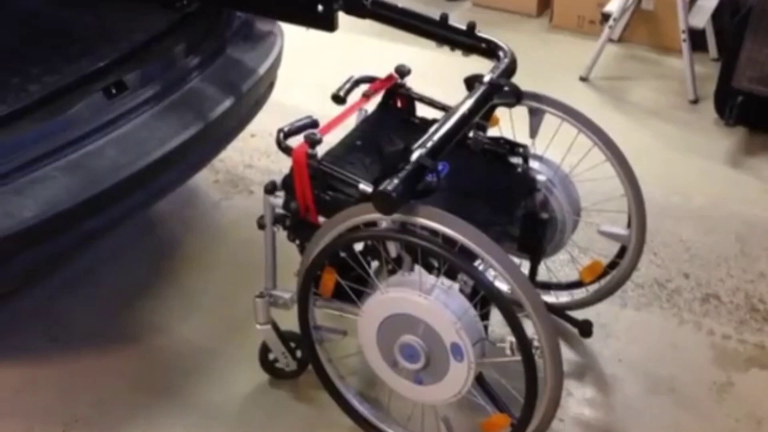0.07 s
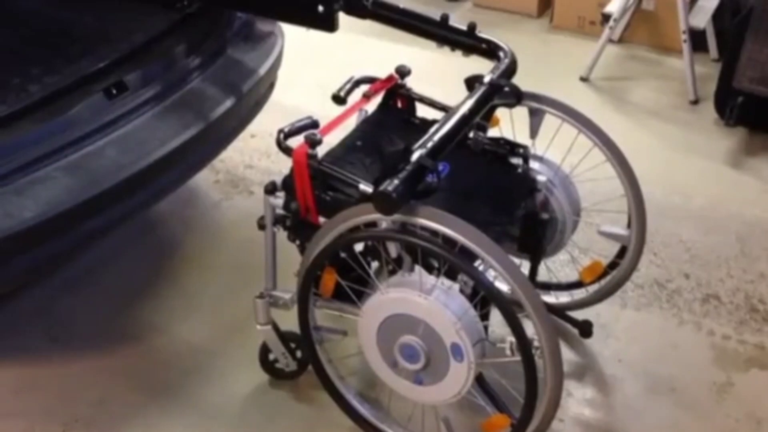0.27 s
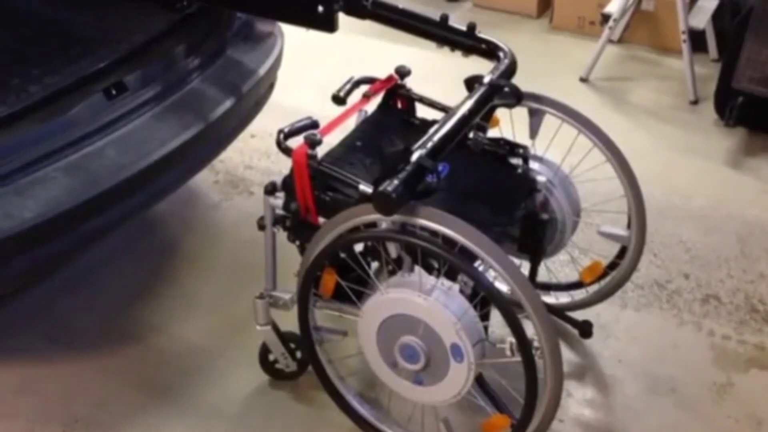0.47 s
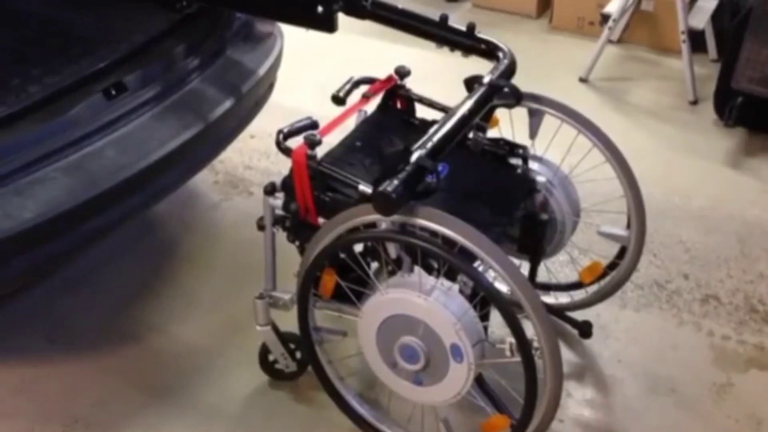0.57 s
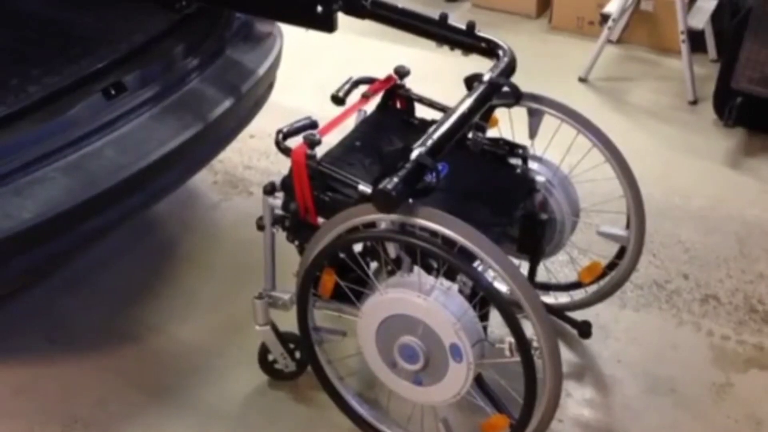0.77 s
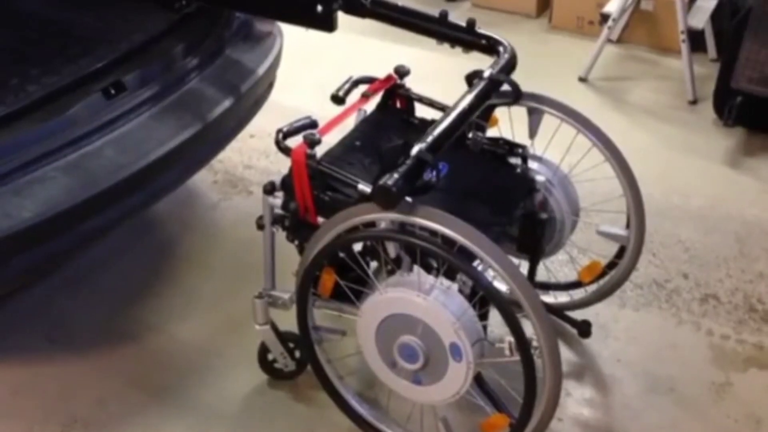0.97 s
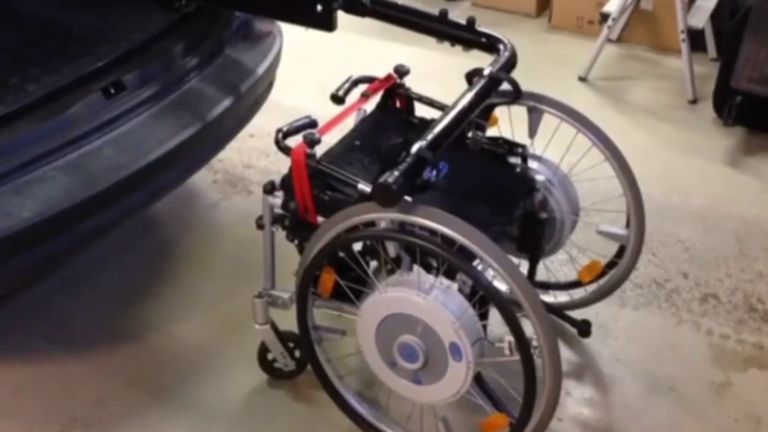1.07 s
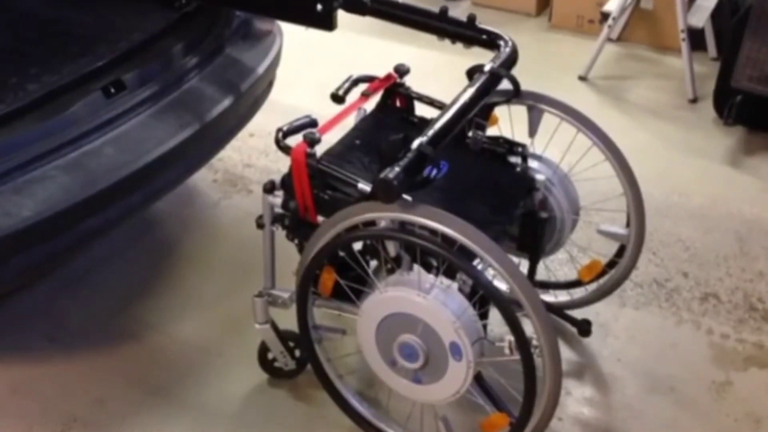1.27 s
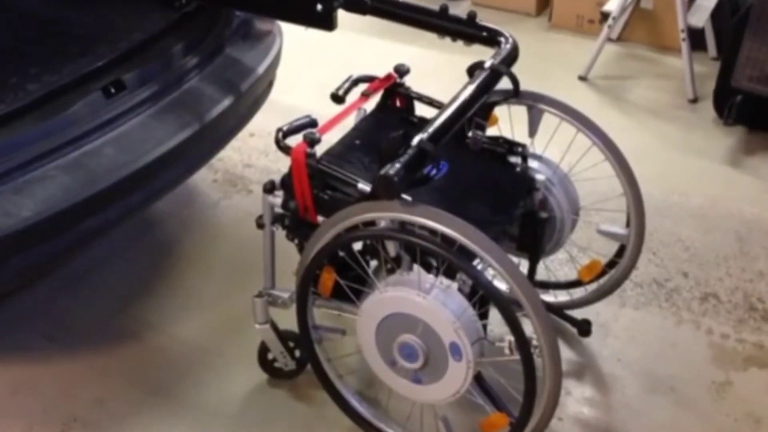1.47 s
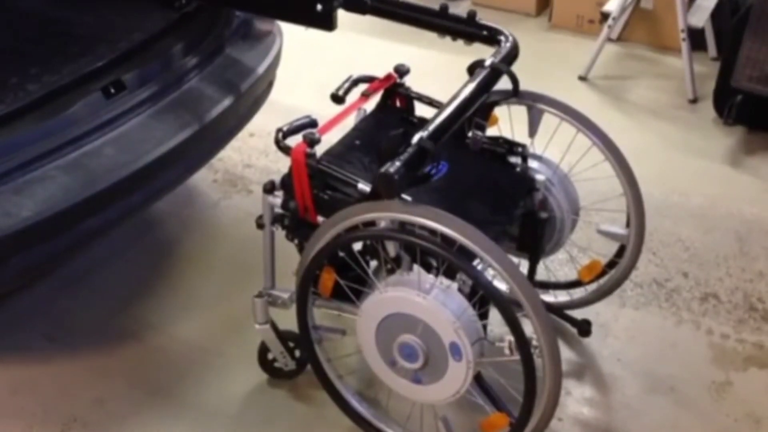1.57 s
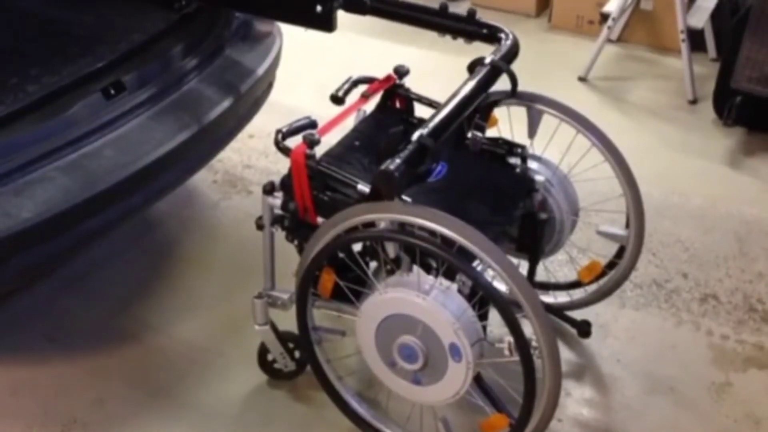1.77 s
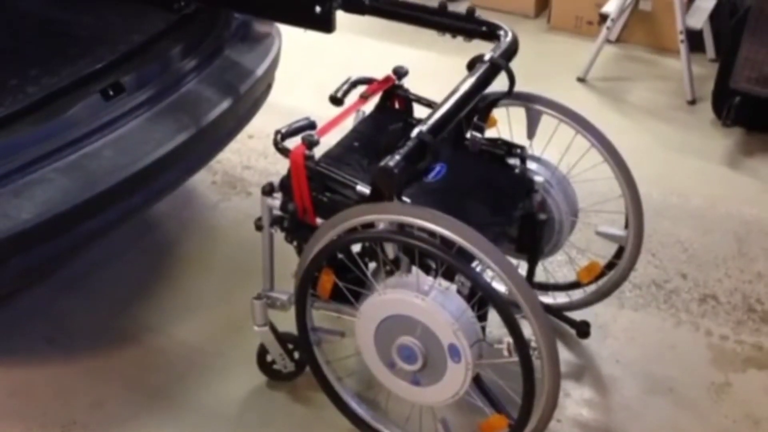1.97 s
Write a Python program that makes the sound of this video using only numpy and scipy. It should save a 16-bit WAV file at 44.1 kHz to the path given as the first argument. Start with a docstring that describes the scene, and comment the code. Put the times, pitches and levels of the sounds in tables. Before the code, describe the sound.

An electric hoist motor starts and runs in a garage. Until 0.6 s there is only faint room noise and hum, with a barely audible thud near 0.14 s. At 0.6 s a switch ticks and hard metallic clacks cluster; by 0.7 s the motor whines up, then holds steady to 2 s, rattling, hissing and gently pulsing, with a rasp and dull bump around 1.4 s and small high squeaks.

```python
"""A small electric hoist lifts a wheelchair in a garage.
Faint room noise and mains hum come first (filtered noise and a sine), then a dull thud (decaying noise).
A switch ticks, the drive takes up its slack with a clack (clicks through resonators), and the motor spins up.
At steady speed the gears whine and beat (wavering partials) and rattle (tooth impacts in a resonant housing),
an idler rasps, the brushes hiss (filtered noise), and the hum swells once per turn of a slow gear."""
import sys
import numpy as np
from scipy import signal
from scipy.fft import rfft, irfft
from scipy.io import wavfile

SR = 44100
rng = np.random.default_rng(int(sys.argv[2]) if len(sys.argv) > 2 else 0)


def persist_wave(psi):
    """Save psi, clipped to +-1, as 16-bit WAV."""
    counts = np.round(np.clip(psi, -1, 1) * 32767).astype(np.int16)
    wavfile.write(sys.argv[1], SR, np.atleast_2d(counts).T)


N = 89126
TIME = np.arange(N) / SR  # s

# moments shared by several sources
SWITCH_S, START_S, SPIN_UP_S = 0.6018, 0.62, 0.065
WHINE_START_S, WHINE_RISE_S = 0.678, 0.023


def from_db(db):
    """Level law: decibels to amplitude gain."""
    return 10 ** (np.asarray(db) / 20)


def rms_one(x):
    """Normalisation: scale to unit power."""
    return x / np.sqrt(np.mean(x ** 2) + 1e-20)


def in_time(rows):
    """Linear interpolation: join (time, value) rows by straight lines."""
    return np.interp(TIME, *np.transpose(rows))


def fade_in(start, length):
    """Linear onset: a straight rise from 0 to 1."""
    return np.clip((TIME - start) / length, 0, 1)


def drift(rate):
    """Random modulation: low-passed noise of unit rms, faster for a higher rate."""
    step = 40  # samples between computed values
    warm_up = 2000  # values dropped while the filter settles
    r = np.exp(-2 * np.pi * rate * step / SR)
    draws = rng.standard_normal(N // step + warm_up + 2)
    slow = signal.lfilter([1], [1, -2 * r, r * r], draws)[warm_up:]
    return np.interp(np.arange(N) / step, np.arange(len(slow)), rms_one(slow))


def noise(colour):
    """Spectral shaping: random noise weighted by (frequency, dB) points, at unit rms."""
    hz, db = np.transpose(colour)
    bins_hz = np.fft.rfftfreq(N, 1 / SR)
    gain = from_db(np.interp(np.log(bins_hz + 1), np.log(hz), db))
    spectrum = rfft(rng.standard_normal(N))
    return rms_one(irfft(spectrum * gain, N))


def dying(start, t60):
    """Exponential decay: the envelope of a blow, falling 60 dB in t60 seconds."""
    return (TIME >= start) * from_db(-60 * np.maximum(TIME - start, 0) / t60)


def swells(rows, width):
    """Gaussian envelopes: smooth bursts at (time, dB) rows."""
    return sum(from_db(db) * np.exp(-((TIME - s) / width) ** 2) for s, db in rows)


def clicks(times, db):
    """Impulsive excitation: one single-sample click per contact."""
    out = np.zeros(N)
    at = np.clip((times * SR).astype(int), 0, N - 1)
    np.add.at(out, at, from_db(db))
    return out


def ring(hits, modes):
    """Modal synthesis: contacts ring the (frequency, dB, t60) modes of a metal part."""
    out = 0
    for k, (hz, db, t60) in enumerate(modes):
        r = np.exp(-np.log(1000) / (t60 * SR))
        w = 2 * np.pi * hz / SR
        mode = signal.lfilter([.5, 0, -.5], [1, -2 * r * np.cos(w), r * r], hits + 1e-18)
        out = out + (-1) ** k * from_db(db) * mode  # neighbouring modes alternate in sign
    return out


GARAGE_T60_S = 0.22


def garage(x, wet_db):
    """Reverberation: convolution with decaying noise adds the dense reflections of floor and walls."""
    first_echo_s = 0.0044
    tail = rng.standard_normal(N) * dying(first_echo_s, GARAGE_T60_S)
    reflections = signal.fftconvolve(x, tail / np.linalg.norm(tail))[:N]
    return x + from_db(wet_db) * reflections


def low_pass(x, hz):
    """Elliptic filtering: a steep cut of the treble."""
    return signal.sosfilt(signal.ellip(10, .3, 70, hz, fs=SR, output="sos"), x)


LOW_CUT_HZ = 200


def low_cut(x):
    """High-pass filtering: takes the deep bass out of the knocks and thuds."""
    return signal.sosfilt(signal.butter(4, LOW_CUT_HZ, "high", fs=SR, output="sos"), x)


# spectrum of the room noise: pitch_hz [Hz], relative level_db [dB]
AIR_COLOUR = [(30, -27), (65, -21.5), (130, -12), (252, -11.5), (400, -13.5), (603, -18.5), (1870, -23.5),
              (8500, -28), (11000, -43)]
AIR_RMS_DB, HUM_HZ, HUM_RMS_DB = -65.5, 99.6, -76


def background():
    """Stationary sound: faint broadband room noise and a sinusoidal mains hum."""
    air = from_db(AIR_RMS_DB) * noise(AIR_COLOUR)
    hum = from_db(HUM_RMS_DB) * rms_one(np.sin(2 * np.pi * HUM_HZ * TIME))
    return air + hum


# dull bumps of the arm and its load: start_s [s], level_db [dB]
BUMPS = [(0.14, -64.5), (0.62, -44.5), (0.638, -48.5), (1.422, -47.5), (1.725, -49)]
# spectrum of a bump: pitch_hz [Hz], relative level_db [dB]
BUMP_COLOUR = [(70, -41), (140, 3), (300, -5.5), (600, -1), (2000, -23.5), (8000, -51)]
BUMP_T60_S = 0.16


def bumps():
    """Damped impact: short, dull thuds of exponentially decaying noise."""
    blows = sum(from_db(db) * dying(s, BUMP_T60_S) for s, db in BUMPS)
    return noise(BUMP_COLOUR) * blows


# spectrum of the switch tick: pitch_hz [Hz], relative level_db [dB]
SWITCH_COLOUR = [(60, -41), (300, -12), (1500, 8), (4000, 4), (6000, 2.5), (8000, 4), (9500, 7)]
SWITCH_DB, SWITCH_T60_S = -39.5, 0.18
# the drive knocks as it takes up slack: start_s [s], level_db [dB]
KNOCKS = [(0.606, -39), (0.6132, -30), (0.6154, -28.5), (0.6214, -38.5), (0.6274, -37.5), (0.637, -51),
          (0.645, -40), (0.685, -41)]
# spectrum of the noise burst in each knock: pitch_hz [Hz], relative level_db [dB]
CRACK_COLOUR = [(60, -51), (250, -24), (1100, -0.5), (1600, 4), (2200, 0), (2800, -2), (4000, -6),
                (8500, -22.5)]
CRACK_DB, CRACK_T60_S = -6, 0.056  # level relative to the knock
# ringing of the brake and coupling when knocked: pitch_hz [Hz], relative level_db [dB], t60_s [s]
COUPLING_MODES = [(410, -28, 0.13), (853, -24.5, 0.24), (1223, -17, 0.25), (1505, -6.5, 0.073),
                  (1736, -1.5, 0.037), (1865, -10, 0.25), (2070, -9.5, .1), (2175, -2, 0.03),
                  (3640, -18, 0.06)]
KNOCK_ROOM_DB = -21.5  # reflections relative to the direct sound


def switch_on():
    """Impact excitation: the tick of the switch, then knocks that crack and ring the coupling."""
    tick = from_db(SWITCH_DB) * noise(SWITCH_COLOUR) * dying(SWITCH_S, SWITCH_T60_S)
    blows = sum(from_db(db + CRACK_DB) * dying(s, CRACK_T60_S) for s, db in KNOCKS)
    crack = noise(CRACK_COLOUR) * blows
    ringing = ring(clicks(*np.transpose(KNOCKS)), COUPLING_MODES)
    return garage(tick + crack + ringing, KNOCK_ROOM_DB)


# resonances of the motor case: pitch_hz [Hz], width_hz [Hz], level_db [dB against the hiss]
CASE_RESONANCES = [(4003, 41, -15), (4560, 12, -13.5), (5660, 40, -13.5)]


def motor_case(hiss):
    """Resonance: noise-driven modes of the case sing faintly beside the hiss."""
    out = hiss
    for hz, width_hz, db in CASE_RESONANCES:
        r = np.exp(-np.pi * width_hz / SR)
        w = 2 * np.pi * hz / SR
        rubbing = rng.standard_normal(N)
        singing = signal.lfilter([1, 0, -1], [1, -2 * r * np.cos(w), r * r], rubbing)
        out = out + from_db(db) * rms_one(singing)
    return out


# spectrum of brushes and bearings: pitch_hz [Hz], relative level_db [dB per Hz]
RUB_COLOUR = [(60, -42), (130, -1), (450, 1), (1050, 6.5), (1400, 11.5), (2250, -7), (2500, 5.5),
              (2900, -3.5), (3100, 1), (4000, -6), (5100, -1.5), (6200, -1.5), (7100, 0.5), (7450, -3.5),
              (8150, 4), (8700, -10)]
RUB_DB, RUB_RISE_S = -46, 0.033  # level of the hiss before modulation
RUB_PER_TURN, RUB_WOBBLE_DB, RUB_WOBBLE_HZ = 0.026, 1.12, 2.7  # pulse depth 0-1; wobble rms and rate


def brushes(turns):
    """Friction noise: rubbing hiss, amplitude-modulated by each turn and by a slow wobble."""
    wobble_db = RUB_WOBBLE_DB * drift(RUB_WOBBLE_HZ)
    pulse = 1 + RUB_PER_TURN * np.cos(2 * np.pi * turns)
    level = from_db(RUB_DB + wobble_db) * pulse
    return motor_case(noise(RUB_COLOUR)) * level * fade_in(SWITCH_S, RUB_RISE_S)


# spectrum of the idler's rasp: pitch_hz [Hz], relative level_db [dB per Hz]
RASP_COLOUR = [(1200, -41), (1800, -2), (2200, 8), (2550, -8), (2900, -17), (3500, -1.5), (4100, -6.5),
               (5800, -8), (6600, -19)]
RASP_DB, RASP_GRAIN_DB, RASP_GRAIN_HZ = -46.5, 0.5, 296  # level at the height of a rasp; grain rms, rate
RASP_AT_S, RASP_SHARPNESS, IDLER_RATIO = 1.413, 1.3, 4.5  # one peak; narrowness; shaft turns per idler turn
# harder scrapes of the gears: start_s (centre of burst) [s], level_db [dB]
SCRAPES = [(0.843, -51), (1.1, -52), (1.16, -54.5), (1.42, -48), (1.67, -50)]
# spectrum of a scrape: pitch_hz [Hz], relative level_db [dB]
SCRAPE_COLOUR = [(1000, -10), (2300, 0), (4000, 7), (5000, -11), (6000, -27)]
# short squeaks of a bearing: start_s (centre of burst) [s], level_db [dB]
SQUEAKS = [(0.98, -58), (1.232, -51.5), (1.298, -53), (1.55, -45.5), (1.62, -50), (1.872, -49.5)]
# spectrum of a squeak: pitch_hz [Hz], relative level_db [dB]
SQUEAK_COLOUR = [(5350, -40), (5590, -3), (5680, 0), (6000, -40)]
SCRAPE_WIDTH_S, SQUEAK_WIDTH_S = 0.025, 0.016


def idler(turns):
    """Periodic friction: a grainy rasp on each idler turn, with harder scrapes and bearing squeaks."""
    angle = 2 * np.pi * (turns - np.interp(RASP_AT_S, TIME, turns)) / IDLER_RATIO
    contact = np.exp(RASP_SHARPNESS * (np.cos(angle) - 1))
    rasp = from_db(RASP_DB) * noise(RASP_COLOUR) * contact * fade_in(WHINE_START_S, SPIN_UP_S)
    scrapes = noise(SCRAPE_COLOUR) * swells(SCRAPES, SCRAPE_WIDTH_S)
    squeaks = noise(SQUEAK_COLOUR) * swells(SQUEAKS, SQUEAK_WIDTH_S)
    grain = rms_one(from_db(RASP_GRAIN_DB * drift(RASP_GRAIN_HZ)))
    return grain * (rasp + scrapes) + squeaks


# ringing of the gear housing: pitch_hz [Hz], relative level_db [dB], t60_s [s]
HOUSING_MODES = [(1018.4, -10, 0.056), (1198, 0, 0.017), (1480, -9, 0.058), (1631, 1.5, 0.026),
                 (1737, 1, 0.024), (1822, -3.5, 0.051), (1980, 2, 0.012), (2232, -3, 0.021),
                 (4180, -7.5, 0.0082)]
# course of the gear rattle: start_s [s], level_db [dB before the trim]
RATTLE_COURSE = [(0.66, -38.5), (0.785, -41), (0.85, -43.5), (0.94, -45), (1.02, -39.5), (1.19, -45),
                 (1.32, -39.5), (1.45, -41.5), (1.49, -45.5), (1.61, -38), (1.73, -40.5), (1.765, -47.5),
                 (1.8, -40.5), (2.02, -40.5)]
RATTLE_TRIM_DB, RATTLE_ROOM_DB, RATTLE_PER_TURN = -2.5, -16.5, 0.078  # last: depth of the pulse 0-1
TEETH, TOOTH_UNEVEN_DB, TOOTH_CHANCE_DB, TOOTH_JITTER_S = 16, 1, 2.5, 0.00025


def rattle(turns):
    """Tooth impact: each tooth strikes with its own strength, varied on every turn, and rings the housing."""
    times = TIME[1:][np.diff(np.floor(turns * TEETH)) > 0]
    strike = np.arange(len(times))
    own_db = TOOTH_UNEVEN_DB * rng.standard_normal(TEETH)
    jitter = TOOTH_JITTER_S * rng.standard_normal(len(times))
    chance_db = TOOTH_CHANCE_DB * np.clip(rng.standard_normal(len(times)), -2, 2)
    hits = clicks(times + jitter, own_db[strike % TEETH] + chance_db)
    hits = hits * (1 + RATTLE_PER_TURN * np.cos(2 * np.pi * turns))
    ringing = rms_one(garage(ring(hits, HOUSING_MODES), RATTLE_ROOM_DB))
    level = from_db(RATTLE_TRIM_DB + in_time(RATTLE_COURSE))
    return ringing * level * fade_in(START_S, SPIN_UP_S)


SLOW_GEAR_HZ, HEAVIEST_S = 3.5, 1.125  # turns per second; a moment of greatest load


def load(lag):
    """Periodic loading: the load rises and falls, from -1 to 1, once per turn of the slow gear."""
    return np.cos(2 * np.pi * SLOW_GEAR_HZ * (TIME - lag - HEAVIEST_S))


def tone(cycles, flutter, flutter_hz):
    """Narrow-band modulation: a partial of nominal unit rms that wavers in strength and phase."""
    steady = np.sqrt(2 - 2 * flutter ** 2)
    waver = steady + flutter * (drift(flutter_hz) + 1j * drift(flutter_hz))
    return np.real(waver * np.exp(2j * np.pi * (cycles + rng.random())))


# low hum of the drive: multiple [of shaft speed], level_db [rms dB before trim, swell and surge],
# swell_db [dB, with the load], lag_s [s], flutter [share 0-1]
DRONE = [(4.05, -66, 4.5, .08, .4), (7.92, -56.5, 6, 0, .25), (12.03, -61.5, 3.5, 0, .3)]
DRONE_TRIM_DB, DRONE_FLUTTER_HZ = -.5, 17.5
# tones of the gears: multiple [of shaft speed], level_db [rms dB before trim, beat and surge],
# flutter [share 0-1], beat [depth 0-1, once per shaft turn]
GEAR_TONES = [(15, -58, .5, .6), (15.78, -53.5, .4, .9), (16, -48.5, .3, .95), (16.72, -54.5, .45, .7),
              (22.95, -55.5, .5, .3), (24.24, -54, .45, 0), (30.25, -58, .3, 0), (32.6, -58.5, .3, 0)]
WHINE_TRIM_DB, FLUTTER_HZ = -1.94, 27.7
SURGE_DB, SURGE_S = 6.5, 0.047  # the whine is louder while the motor gathers speed; decay time


def whine(turns):
    """Gear-mesh tones: a hum swells with the load, and partials beat per turn of an off-centre pinion."""
    hum = 0
    for multiple, db, swell_db, lag, flutter in DRONE:
        level = from_db(DRONE_TRIM_DB + db + swell_db * load(lag))
        hum = hum + level * tone(multiple * turns, flutter, DRONE_FLUTTER_HZ)
    gears = 0
    for multiple, db, flutter, beat in GEAR_TONES:
        beating = 1 + beat * np.cos(2 * np.pi * turns)
        gears = gears + from_db(WHINE_TRIM_DB + db) * beating * tone(multiple * turns, flutter, FLUTTER_HZ)
    surge_db = SURGE_DB * np.exp(-np.maximum(TIME - WHINE_START_S, 0) / SURGE_S)
    return from_db(surge_db) * (hum + gears) * fade_in(WHINE_START_S, WHINE_RISE_S)


# motor shaft before the load slows it: start_s [s], speed [turns per second]
SHAFT_SPEED = [(0.613, 35), (0.672, 63.3), (0.73, 64.3), (0.76, 69), (0.79, 70.2), (0.92, 70.55),
               (2.02, 70.55)]
LOAD_SAG = 0.0043  # share of speed lost at the greatest load
MESH_S = 1.405  # a moment when the pinion bites hardest


def scene():
    """Kinematic coupling: one shaft drives all running sounds, and the load slows it slightly."""
    speed = in_time(SHAFT_SPEED) * (1 - LOAD_SAG * load(0))
    turns = np.cumsum(speed) / SR
    turns = turns - np.interp(MESH_S, TIME, turns)
    rubbing = brushes(turns) * speed / speed.max()
    running = whine(turns) + rattle(turns) + idler(turns) + rubbing
    struck = low_cut(switch_on() + bumps())
    return (running + struck + background())[None]


OPEN_S, TOP_HZ, CUTOFF_HZ = 0.0895, 8900, 10900  # sound opens; top of the scene; top of scene and hiss
HISS_DB = -74.5  # rms before the last cut


def record(dry):
    """Band limiting: a steep top cut, with faint hiss above it; the sound opens just after the start."""
    heard = low_pass(dry, TOP_HZ) + from_db(HISS_DB) * rng.standard_normal(N)
    return low_pass(heard * (TIME >= OPEN_S), CUTOFF_HZ)


dry = scene()
out = record(dry)
persist_wave(out)
```